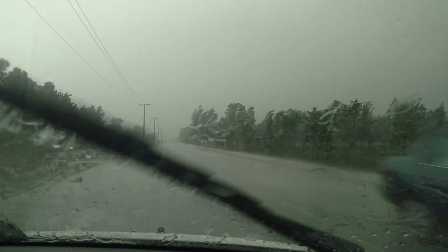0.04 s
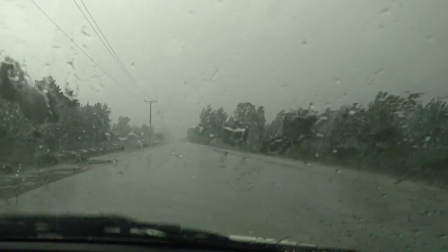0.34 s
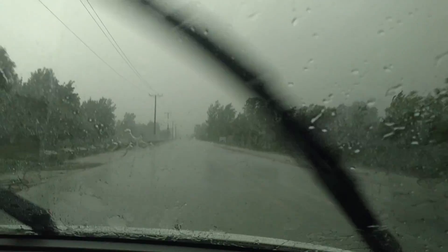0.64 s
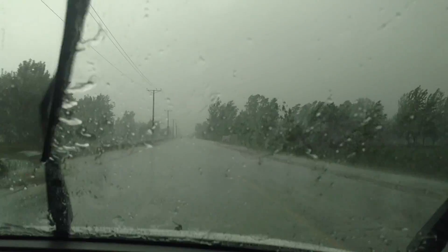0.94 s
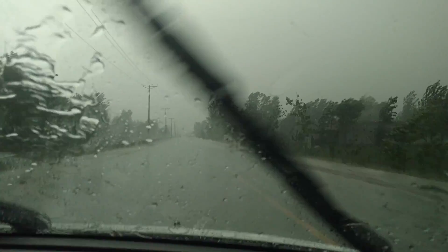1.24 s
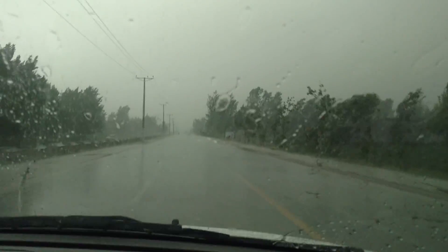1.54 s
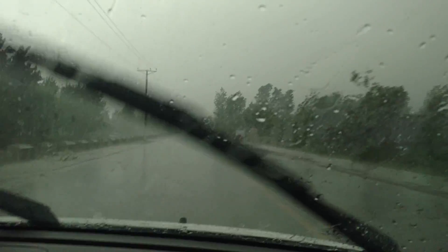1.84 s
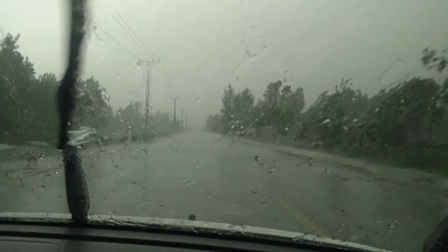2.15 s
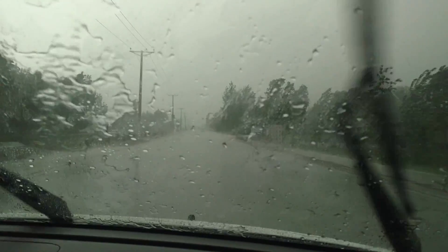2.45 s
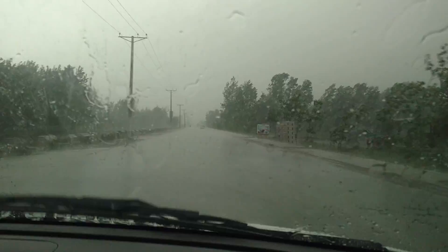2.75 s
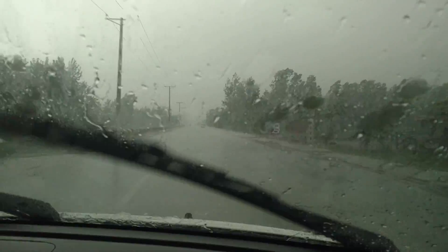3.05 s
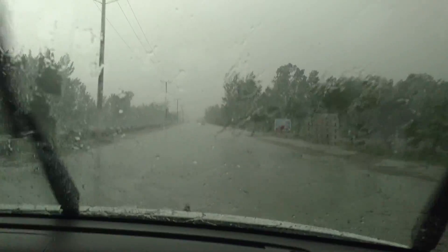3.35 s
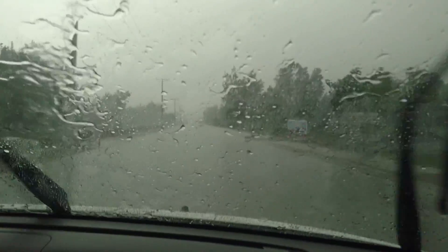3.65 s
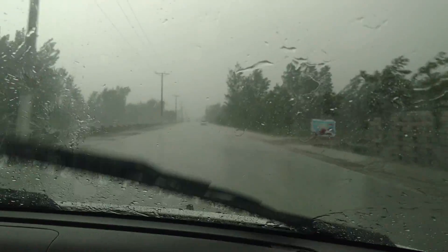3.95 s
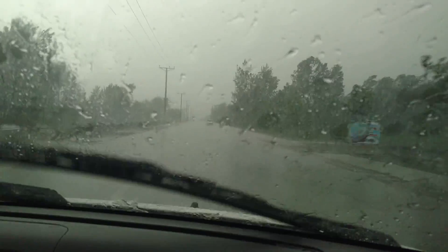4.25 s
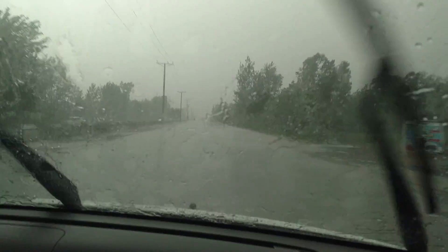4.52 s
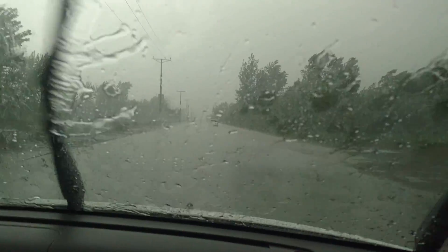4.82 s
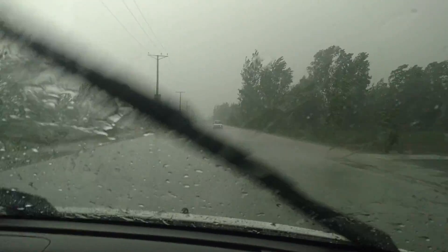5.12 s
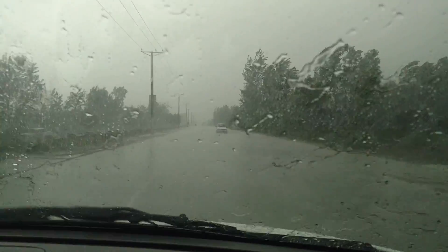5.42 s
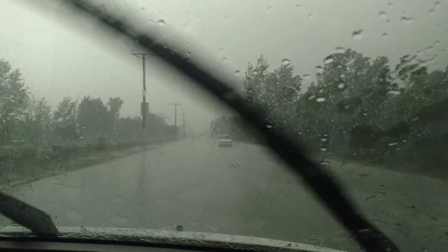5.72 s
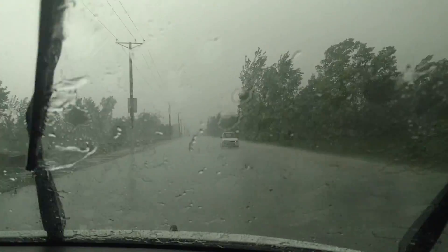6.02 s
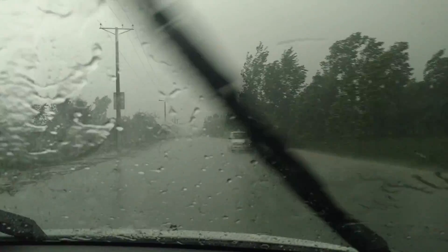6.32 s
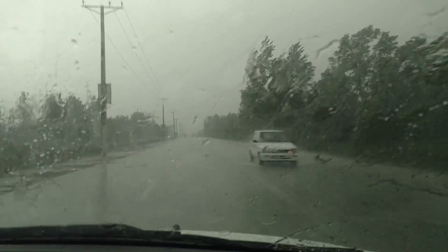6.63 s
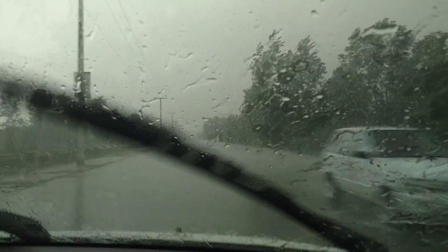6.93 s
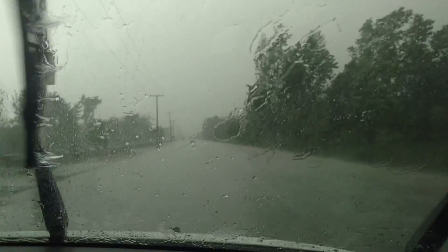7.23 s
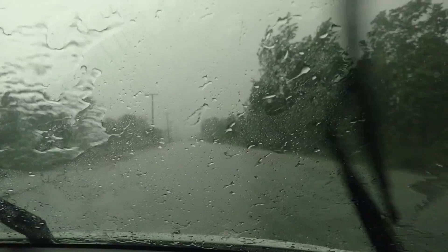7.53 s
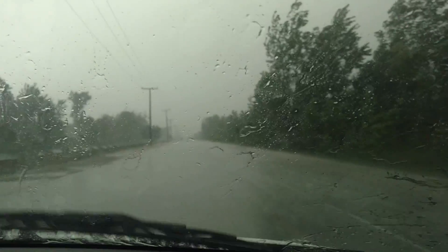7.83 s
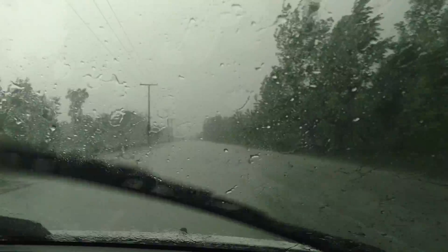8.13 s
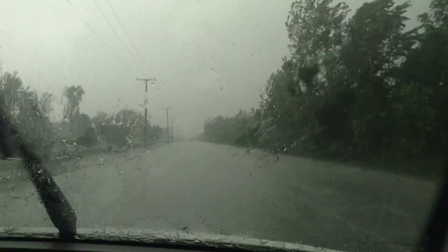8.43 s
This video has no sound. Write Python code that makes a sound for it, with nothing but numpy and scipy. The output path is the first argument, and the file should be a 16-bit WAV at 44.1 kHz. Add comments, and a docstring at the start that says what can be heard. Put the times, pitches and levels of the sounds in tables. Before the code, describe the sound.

From the cabin of a car driving through a downpour, rain crackles and hisses across the windshield the whole time, surging with sudden slaps of water and sharp ticks from big drops. Muffled drumming comes from the roof, above a low road rumble and a faint engine hum. In the second half the car thuds softly over bumps and throws up short rushes of water. The rain sounds close and wide.

```python
"""Heavy rain on a car's windscreen, heard from inside while driving. Each drop makes the glass ring
briefly; thousands blend into sheets of crackle, with fine spray and fat drops ticking out on top.
The lined roof drums more dully. Below, the tyres rumble, thrown water rushes, bumps thud, and
the engine and cabin hum faintly. A small microphone with two openings (ports) subtracts part of
each side from the other, which widens the stereo."""
import sys
import numpy as np
from scipy import signal
from scipy.fft import rfft, irfft, next_fast_len
from scipy.io import wavfile
from scipy.ndimage import uniform_filter1d

SR = 44100
rng = np.random.default_rng(int(sys.argv[2]) if len(sys.argv) > 2 else 0)


def digitize_waveform(pressure):
    """Quantize a signal to 16-bit integers and store it at the path in sys.argv[1].

    Rows of a 2-D input are taken as channels; values are limited to [-1, 1].
    """
    field = np.atleast_2d(pressure).T
    bounded = np.clip(field, -1, 1)
    quanta = np.round(bounded * 32767).astype(np.int16)
    wavfile.write(sys.argv[1], SR, quanta)


N = 382347
TIME = np.arange(N) / SR

# Levels in the tables are relative: each sound adds its own overall gain.
# how hard the sheets of rain beat down: time_s, level_db
RAIN_SHEETS = [(0.0, -26), (0.22, -21), (0.56, -23), (1.25, -26.5), (1.32, -24), (1.94, -31), (1.95, -24.5),
               (2.5, -24), (2.85, -31.5), (3.15, -23), (3.72, -24), (4.0, -26.5), (4.07, -24), (5.16, -23),
               (5.51, -30.5), (5.79, -19.5), (5.85, -28), (6.5, -23), (7.22, -26.5), (7.58, -23.5),
               (7.86, -28), (8.11, -23), (8.67, -26.5)]
# the rain eases for an instant: middle_s, half_length_s, depth_db
RAIN_LULLS = [(0.345, 0.036, 4), (0.702, 0.036, 4), (1.093, 0.021, 5), (1.406, 0.045, 6.5),
              (1.685, 0.025, 5), (1.803, 0.015, 1), (2.041, 0.024, 4), (2.382, 0.015, 2.5),
              (2.787, 0.021, 3.5), (2.982, 0.02, 0.5), (3.656, 0.015, 3.5), (3.829, 0.01, 1.5),
              (3.964, .025, 2), (4.13, .015, 3.5), (5.341, 0.049, 4), (5.51, 0.012, 4), (6.344, 0.022, 2),
              (6.843, 0.018, 3), (7.067, 0.015, 5), (7.24, 0.024, 2.5), (7.934, 0.018, 5),
              (8.426, 0.021, 1)]
# a clump of water slaps the glass: start_s, length_s, level_db
WATER_SLAPS = [(0.028, 0.054, -28.5), (0.417, 0.011, -23.5), (0.476, 0.15, -26.5), (0.763, 0.028, -23),
               (1.126, 0.03, -26.5), (1.747, 0.016, -29), (0.836, 0.031, -26.5), (1.93, 0.031, -26.5),
               (2.392, 0.13, -27), (2.618, 0.062, -28.5), (2.819, 0.095, -25.5), (3.017, 0.052, -20.5),
               (3.122, 0.029, -24), (3.22, 0.15, -27), (3.508, 0.028, -25), (3.694, 0.023, -27),
               (4.075, 0.016, -25.5), (4.308, 0.019, -24), (4.641, 0.018, -23.5), (4.777, 0.089, -26),
               (5.236, 0.027, -29.5), (5.388, 0.015, -27.5), (5.944, 0.1, -25), (6.182, 0.033, -24),
               (6.454, 0.057, -24), (6.973, .02, -29.5), (7.102, 0.014, -30), (7.803, 0.025, -21.5),
               (7.883, 0.011, -24), (8.07, 0.06, -26.5), (8.277, 0.09, -25), (8.474, 0.025, -26.5)]
# tone of the rain on the glass: frequency_hz, left_db, right_db
GLASS_TONE = [(300, -26, -27.5), (910, -26, -24), (2213, -7.5, -4.5), (2450, -24, -28.5),
              (2873, -16.5, -6.5), (3500, -6, -4.5), (3760, -9, -3), (4640, -8.5, 0), (5420, -11, -6),
              (6000, -8.5, -12.5), (7500, -12.5, -12), (8600, -14, -14), (12100, -22, -19.5),
              (14900, -41, -38)]
# slow swell of the spray, on top of the rain's: time_s, level_db
SPRAY_SWELL = [(0, 1), (.6, -4), (1.1, 4), (1.6, 2.5), (2.3, -2.5), (3.1, -4.5), (3.65, 3.5), (4.2, 0.5),
               (5.1, -4), (5.75, 1), (6.4, 0), (7.5, 1), (8.67, 1)]
# tone of the spray: frequency_hz, left_db, right_db
SPRAY_TONE = [(2480, -5, -22), (4870, 5.5, 8), (8200, 3.5, 0), (12200, -4, -2), (15000, -20, -12)]
# slow swell of the roof's drumming, on top of the rain's: time_s, level_db
ROOF_SWELL = [(0, -2.5), (.6, 2), (1.35, -3), (2.1, 0), (2.95, 0.5), (3.5, 0.5), (3.7, -1.5), (4.65, 0),
              (5.6, -0.8), (6.45, 0.5), (7.25, -2), (7.8, 0.5), (8.67, -1)]
# tone of the roof: frequency_hz, left_db, right_db
ROOF_TONE = [(61, -22.5, -25), (187, -7, -8), (277, -10, -9), (394, -5.5, -10), (560, -8, -11.5),
             (693, -11.5, -14), (828, -7.5, -8.5), (1124, -12.5, -12), (1430, -15, -10),
             (1870, -24.5, -15.5), (2630, -15, -18.5), (5100, -26.5, -31)]
# rumble of the tyres on the wet road: time_s, level_db
TYRE_LEVEL = [(0, -41), (0.72, -35.5), (1.25, -41.3), (1.47, -38.5), (1.72, -42), (2.38, -37), (2.8, -39),
              (2.98, -33.5), (3.3, -37), (3.75, -41.5), (4.35, -37), (4.85, -36.5), (5.05, -36),
              (5.45, -43), (5.75, -39), (5.95, -42), (6.3, -36.5), (7.27, -43), (7.75, -35), (8.0, -38.9),
              (8.25, -38), (8.67, -40.4)]
# tone of the tyres: frequency_hz, left_db, right_db
TYRE_TONE = [(15, -36, -34), (25, -28, -22), (35, -16, -18), (50, -7, -11.5), (65, -11, -13),
             (101, -6, -6.5), (128, -4.5, -5), (188, -1, -1.5), (279, -10.5, -9.5), (500, -24, -17),
             (1510, -43, -57.5)]
# the car rocks over a bump: middle_s, half_length_s, level_db
BUMPS = [(4.15, 0.11, -48), (4.52, .1, -39), (7.3, .2, -51), (7.806, .25, -48)]
# the engine's firing: time_s, pitch_hz, level_db
ENGINE_HUM = [(0, 77, -49), (1.8, 76, -49), (3.5, 73, -56), (5, 71.2, -70), (6.7, 71, -56),
              (7.3, 69.4, -46), (8.67, 75, -58)]
# a higher cabin hum that swells twice and fades: time_s, pitch_hz, level_db
CABIN_HUM = [(0, 139.7, -52), (1.7, 134, -42.5), (3.2, 135, -54), (4.5, 128, -47.5), (8.67, 130, -64)]
# fat drops on the glass: start_s, knock_db, pitch_hz, snap_db
FAT_DROPS = [(0.7768, -15, 4070, -28), (0.7888, -14, 4350, -30), (0.8986, -17, 4210, -24),
             (0.9838, -14, 4240, -24), (1.1132, -17, 4040, -34), (1.1228, -14, 3930, -30),
             (1.1348, -21, 3900, -22), (1.1471, -22, 4370, -18), (1.2194, -19, 3900, -25),
             (1.2714, -15, 3860, -22), (1.3269, -14, 4380, -36), (1.4355, -24, 4160, -32),
             (1.5808, -19, 4240, -28), (1.5973, -20, 4170, -28), (1.6384, -21, 4510, -21),
             (1.6972, -25, 4350, -29), (2.0875, -19, 4360, -24), (2.1575, -18, 4250, -32),
             (2.1922, -16, 4070, -36), (2.2705, -17, 3870, -35), (2.2959, -15, 3950, -36),
             (2.6164, -19, 3870, -23), (2.6403, -15, 4550, -24), (2.7235, -18, 4090, -28),
             (2.7673, -24, 4130, -28), (2.8244, -19, 4320, -29), (3.0089, -13, 3650, -27),
             (3.1634, -16, 4170, -29), (3.3175, -15, 4330, -26), (3.4137, -14, 4460, -28),
             (3.5161, -15, 4170, -23), (3.5673, -16, 4140, -26), (3.6815, -18, 4440, -24),
             (4.0994, -15, 4340, -32), (4.1589, -17, 4250, -34), (4.2074, -16, 4040, -24),
             (4.312, -15, 4340, -36), (4.3273, -15, 4370, -31), (4.4845, -17, 4130, -34),
             (4.9407, -14, 4050, -36), (5.096, -14, 4030, -36), (5.2576, -16, 4580, -27),
             (5.2903, -10, 4450, -21), (5.3694, -25, 4680, -25), (5.4679, -20, 3800, -35),
             (5.5172, -22, 4320, -36), (5.605, -22, 3620, -30), (5.61, -19, 4570, -33),
             (5.8043, -17, 4100, -28), (5.8458, -21, 3860, -32), (5.8669, -18, 4030, -36),
             (5.9001, -24, 3980, -26), (5.9646, -18, 4530, -23), (6.1837, -13, 4150, -30),
             (6.1893, -15, 3660, -25), (6.2129, -14, 4010, -35), (6.2588, -15, 4030, -25),
             (6.3598, -14, 4390, -29), (6.4121, -17, 4220, -25), (6.5384, -15, 4110, -36),
             (7.1357, -17, 3730, -27), (7.1407, -17, 4100, -21), (7.7965, -16, 4180, -30),
             (7.8079, -17, 3900, -23), (7.9029, -17, 4190, -24), (7.9611, -20, 4590, -25),
             (8.1122, -15, 4450, -36), (8.1382, -15, 3840, -27), (8.2921, -15, 4280, -24),
             (8.3238, -11, 4470, -22)]
# tone of a fat drop's knock: frequency_hz, left_db, right_db
KNOCK_TONE = [(300, -18, -18), (1000, -9, -9), (2300, -12, -12), (3400, -5, -5), (4400, -4, -1),
              (5700, -7, -6), (9000, -20, -20), (15000, -38, -38)]
# brief, dull rushes of thrown water, from puddles or a passing car: middle_s, half_length_s, level_db
WATER_RUSHES = [(4.6, 0.062, -33), (5.12, 0.044, -33.5), (7.12, 0.056, -37), (8.29, 0.054, -35)]
# how alike the ports hear the roof and tyres: frequency_hz, likeness_0_to_1
PORT_LIKENESS = [(150, 0.98), (300, 0.92), (550, 0.92), (750, 0.54), (1000, 0.56), (1400, 0.15), (2500, 0)]
# what each port subtracts of the other: frequency_hz, share_0_to_1, delay_ms
CROSS_FEED = [(1000, 0.89, 0.41), (2300, 0.82, 0.41), (2540, 1, 0.388), (2970, 0.63, 0.41),
              (5060, 0.53, 0.3913), (7500, 0.61, 0.388), (14000, 0.4, 0.394)]

PORT_DELAY_S = 0.000388  # longest travel time between the ports
GLASS_DB, SPRAY_DB, ROOF_DB, TYRE_DB, HUM_DB = -25.5, -37, -33, 6, 6


def from_db(db):
    """Turn decibels into a number to multiply by."""
    return 10 ** (np.asarray(db) / 20)


def rms_one(x):
    """Scale a sound so its average strength (rms) is 1."""
    return x / np.sqrt(np.mean(x ** 2) + 1e-20)


def steady(x, size):
    """Even out the strength over stretches of `size` samples; single drops still stand out."""
    power = uniform_filter1d(np.mean(x ** 2, axis=0), size)
    return x / np.sqrt(power + 1e-12)


def peak_one(x, size=66):
    """Scale a tick so its loudest instant has strength 1."""
    power = uniform_filter1d(np.mean(x ** 2, axis=0), size)
    return x / np.sqrt(power.max())


def in_time(rows):
    """Read a table's curves at every sample."""
    times_s, *columns = np.transpose(rows)
    return [np.interp(TIME, times_s, column) for column in columns]


def at_hz(rows, hz):
    """Read a table's curves at the given frequencies."""
    points_hz, *columns = np.transpose(rows)
    return np.array([np.interp(np.log(hz + 1), np.log(points_hz), column) for column in columns])


def hump(middle_s, half_length_s):
    """A smooth rise to 1 and back."""
    return np.exp(-((TIME - middle_s) / half_length_s) ** 2)


def drift(rate_hz):
    """A smooth random wander, about 1 in size; a higher rate wanders faster."""
    step, warm_up = 40, 2000
    pole = np.exp(-2 * np.pi * rate_hz * step / SR)
    noise = rng.standard_normal(N // step + warm_up + 2)
    slow = signal.lfilter([1], [1, -2 * pole, pole * pole], noise)[warm_up:]
    return np.interp(np.arange(N) / step, np.arange(len(slow)), rms_one(slow))


def shape_tone(x, tone, size=8192):
    """Turn each frequency up or down as a tone table says, left and right separately."""
    gains = from_db(at_hz(tone, np.fft.rfftfreq(size, 1 / SR)))
    # minimum phase: the filter rings only after a hit, never before
    cepstrum = irfft(np.log(gains))
    cepstrum[:, 1:size // 2] *= 2
    cepstrum[:, size // 2 + 1:] = 0
    response = irfft(np.exp(rfft(cepstrum)))
    return signal.oaconvolve(x, response, axes=1)[:, :N]


def blend_ports(x):
    """Low sounds have long waves and reach both ports alike; high sounds do not."""
    size = next_fast_len(N, True)
    alike = np.clip(at_hz(PORT_LIKENESS, np.fft.rfftfreq(size, 1 / SR))[0], 0, 1)
    common, apart = rfft(x, size)
    return irfft(np.sqrt(1 + alike) * common + np.sqrt(1 - alike) * apart * [[1], [-1]], size)[:, :N]


def rain_strength():
    """The rain's swing in dB: slow sheets, brief lulls, random flurries and sudden slaps."""
    sheets_db, = in_time(RAIN_SHEETS)
    lulls_db = sum(depth_db * hump(middle_s, half_s) for middle_s, half_s, depth_db in RAIN_LULLS)
    flurries_db = 0.68 * drift(rate_hz=17)
    power = from_db(sheets_db - lulls_db + flurries_db) ** 2
    rise_s, fade_s = 0.004, 0.037
    for start_s, length_s, level_db in WATER_SLAPS:
        rise = np.clip((TIME - start_s) / rise_s, 0, 1)
        fade = np.exp(-np.maximum(TIME - start_s - length_s, 0) / fade_s)
        power = power + (from_db(level_db) * rise * fade) ** 2
    return 10 * np.log10(power) - sheets_db.mean()


def drop_hit(splash_s, echo_db, echo_s, lag_spread_s, size=3072):
    """A drop hits one spot: a click, a brief splash and a duller cabin echo (60 dB down in echo_s)."""
    t = np.arange(size) / SR
    lag_s = np.clip(rng.normal(0, 1) * lag_spread_s, -PORT_DELAY_S, PORT_DELAY_S)
    age_s = t - PORT_DELAY_S - lag_s / 2 * np.array([[1], [-1]])  # one port hears it first
    click = np.sinc(age_s * SR)
    splash, echo = rng.standard_normal((2, 2, size)) * (age_s > 0)
    splash = rms_one(splash * np.exp(-t / splash_s)) / np.sqrt(size)
    echo = rms_one(echo * from_db(-60 * t / echo_s)) / np.sqrt(size)
    echo = signal.lfilter(*signal.butter(1, 7000, fs=SR), echo)
    return 0.58 * click + splash + from_db(echo_db) * echo


def patter(drops_per_s, spread_db, largest_db, make_hit, spots):
    """Drops of random size land at random moments on several spots, each with its own sound."""
    landings = np.flatnonzero(rng.random(N) < drops_per_s / SR)
    sizes_db = np.minimum(spread_db * rng.exponential(1, N), largest_db)
    sizes = from_db(sizes_db) * rng.choice([-1, 1], N)
    spot_of = rng.integers(0, spots, N)
    out = np.zeros((2, N))
    for spot in range(spots):
        at = landings[spot_of[landings] == spot]
        clicks = np.zeros((1, N))
        clicks[0, at] = sizes[at]
        out += signal.oaconvolve(clicks, make_hit(), axes=1)[:, :N]
    return out


def glass_ring(hit, pitch_hz, width_hz):
    """The glass rings briefly at one pitch, on top of the plain hit."""
    return hit + 2 * signal.lfilter(*signal.iirpeak(pitch_hz, pitch_hz / width_hz, fs=SR), hit)


def windscreen(rain_db):
    """Drops crackle on the glass, each spot at its own pitch; heavier rain is denser and louder."""
    clumps_db = 2 * drift(rate_hz=75)  # drops land in clumps
    drops_per_s = 950 * from_db(1.3 * rain_db + clumps_db)
    spots = 22
    pitches_hz = iter(np.linspace(2930, 4640, spots))

    def make_hit():
        hit = drop_hit(splash_s=0.001, echo_db=-0.5, echo_s=0.08, lag_spread_s=0.0002)
        return glass_ring(hit, next(pitches_hz), width_hz=345)

    drops = patter(drops_per_s, spread_db=3.3, largest_db=9, make_hit=make_hit, spots=spots)
    return from_db(rain_db + GLASS_DB) * steady(shape_tone(drops, GLASS_TONE), size=2000)


def spray(rain_db):
    """Tiny droplets prickle on the glass, bright and dry; they thicken with the rain."""
    swell_db, = in_time(SPRAY_SWELL)
    level_db = rain_db + swell_db
    drops_per_s = 320 * from_db(0.9 * level_db)
    make_hit = lambda: drop_hit(splash_s=0.002, echo_db=-3, echo_s=0.05, lag_spread_s=0.0002)
    drops = patter(drops_per_s, spread_db=4, largest_db=12, make_hit=make_hit, spots=12)
    return from_db(level_db + SPRAY_DB) * steady(shape_tone(drops, SPRAY_TONE), size=5000)


def roof(rain_db):
    """Countless drops drum on sheet metal, dulled by the roof lining."""
    swell_db, = in_time(ROOF_SWELL)
    make_hit = lambda: drop_hit(splash_s=0.0022, echo_db=3.5, echo_s=0.093, lag_spread_s=0.00024)
    drops = patter(drops_per_s=1400, spread_db=3.45, largest_db=13.4, make_hit=make_hit, spots=26)
    drumming = steady(shape_tone(blend_ports(drops), ROOF_TONE), size=2600)
    return from_db(0.89 * rain_db + swell_db + ROOF_DB) * drumming


def tyres():
    """Tyres rolling on the wet road boom in the cabin."""
    level_db, = in_time(TYRE_LEVEL)
    noise = blend_ports(rng.standard_normal((2, N)))
    return from_db(level_db + TYRE_DB) * rms_one(shape_tone(noise, TYRE_TONE))


def hum(curve):
    """The engine or cabin hums one faint, wavering note, a little stronger on the left."""
    pitch_hz, level_db = in_time(curve)
    wavering_hz = pitch_hz * (1 + 0.0043 * drift(rate_hz=2.4))
    phase = 2 * np.pi * np.cumsum(wavering_hz) / SR
    gain = from_db(level_db + HUM_DB + 0.73 * drift(rate_hz=3))
    return gain * np.sin(phase) * from_db([[1.5], [-1.5]])


def fat_drops():
    """Big drops hit the glass straight ahead: a ringing knock, and a bright snap as each bursts."""
    out = np.zeros((2, N))
    treble = signal.butter(2, [5500, 10500], "band", fs=SR, output="sos")
    for start_s, knock_db, pitch_hz, snap_db in FAT_DROPS:
        hit = drop_hit(splash_s=0.0014, echo_db=-5, echo_s=0.03, lag_spread_s=0.00002)
        burst = drop_hit(splash_s=0.002, echo_db=-4, echo_s=0.025, lag_spread_s=0.00002)
        hit = shape_tone(hit, KNOCK_TONE)[:, :hit.shape[1]]
        knock = peak_one(glass_ring(hit, pitch_hz, width_hz=520))
        snap = peak_one(signal.sosfilt(treble, burst))
        tick = from_db(knock_db - 0.4) * knock + from_db(snap_db + 0.4) * snap
        at = int((start_s - PORT_DELAY_S) * SR)
        out[:, at:at + tick.shape[1]] += tick[:, :N - at]
    return out


def noise_surges(events, band_hz):
    """A band of noise swells and fades once for each event."""
    band = signal.butter(2, band_hz, "band", fs=SR, output="sos")
    gain = sum(from_db(level_db) * hump(middle_s, half_s) for middle_s, half_s, level_db in events)
    return gain * rms_one(signal.sosfilt(band, rng.standard_normal(N)))


def bumps():
    """The car's body rocks over uneven road with deep thuds, a little stronger on the left."""
    return noise_surges(BUMPS, band_hz=(36, 60)) * from_db([[1.5], [-1.5]])


def water_rushes():
    """Water thrown up from puddles or by a passing car gives a brief, dull rush."""
    return noise_surges(WATER_RUSHES, band_hz=(260, 670))


def scene():
    """Rain above and ahead, the car and road below."""
    rain_db = rain_strength()
    rain = windscreen(rain_db) + spray(rain_db) + fat_drops() + roof(rain_db)
    driving = tyres() + bumps() + water_rushes() + hum(ENGINE_HUM) + hum(CABIN_HUM)
    return rain + driving


def record(dry):
    """The microphone takes a delayed share of each port from the other, rounds peaks and cuts the top."""
    size = next_fast_len(N + 2048, True)
    hz = np.fft.rfftfreq(size, 1 / SR)
    ports = rfft(dry, size)
    share, delay_ms = at_hz(CROSS_FEED, hz)
    feed = np.clip(share, 0, 1) * np.exp(-2j * np.pi * hz * delay_ms / 1000)
    wide = irfft(ports - feed * ports[::-1], size)  # some frequencies cancel, others grow
    ceiling, cutoff_hz = 0.95, 15100
    rounded = wide / (1 + (wide / ceiling) ** 6) ** (1 / 6)
    low_pass = 1 / np.sqrt(1 + (hz / cutoff_hz) ** 160)
    return irfft(rfft(rounded) * low_pass, size)[:, :N]


dry = scene()
out = record(dry)
digitize_waveform(out)
```